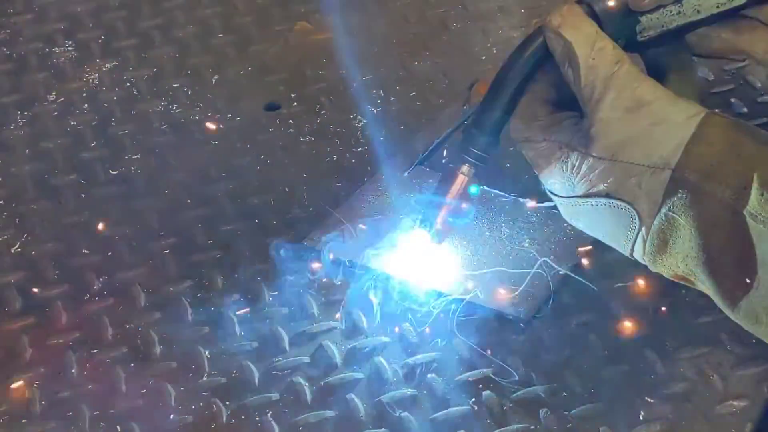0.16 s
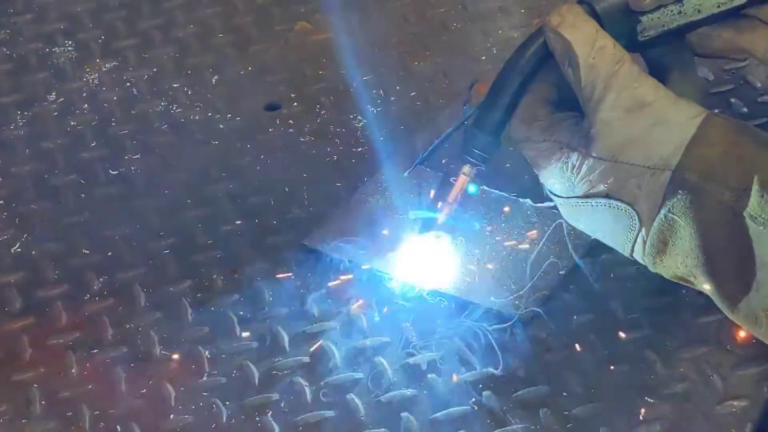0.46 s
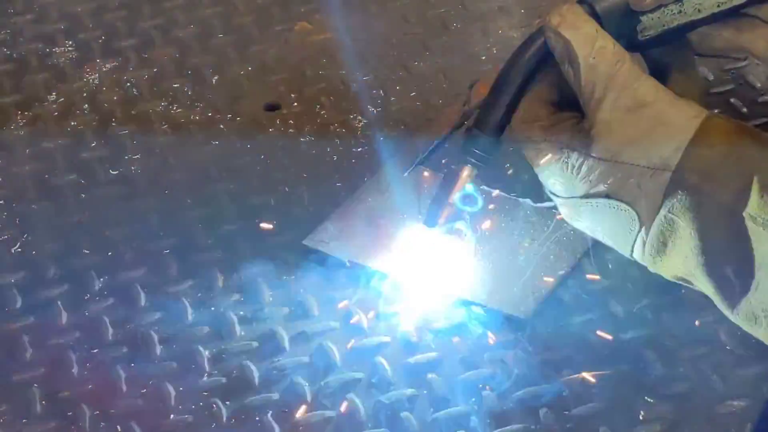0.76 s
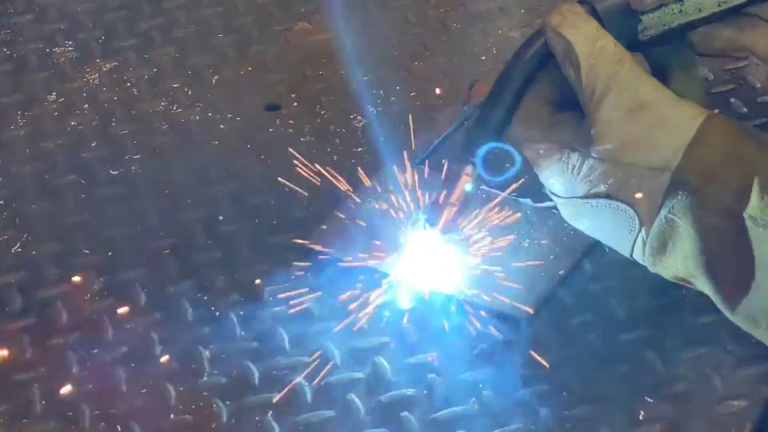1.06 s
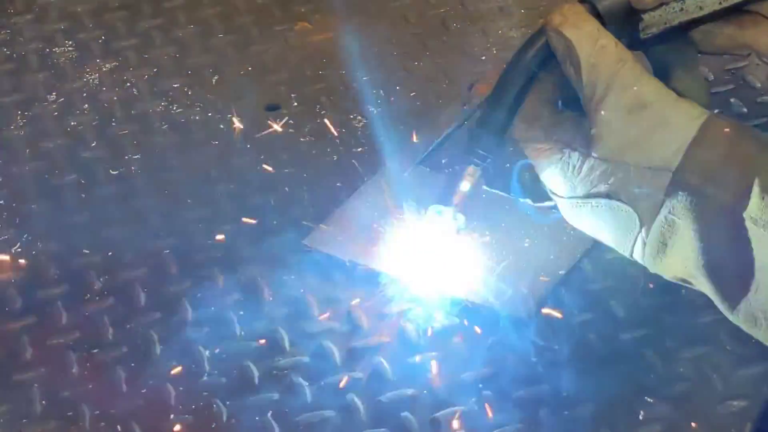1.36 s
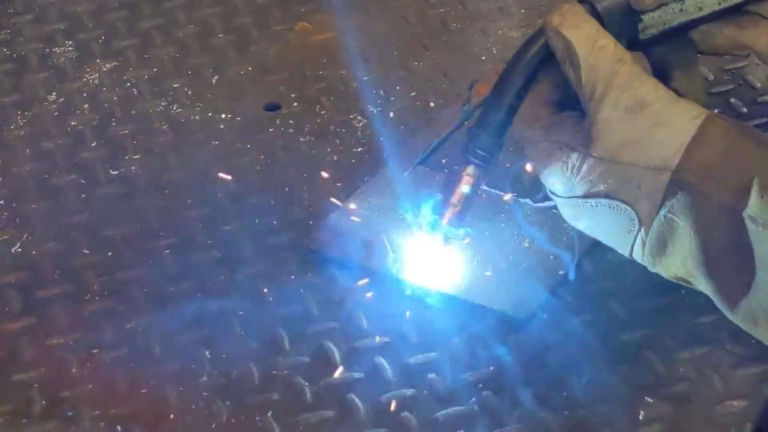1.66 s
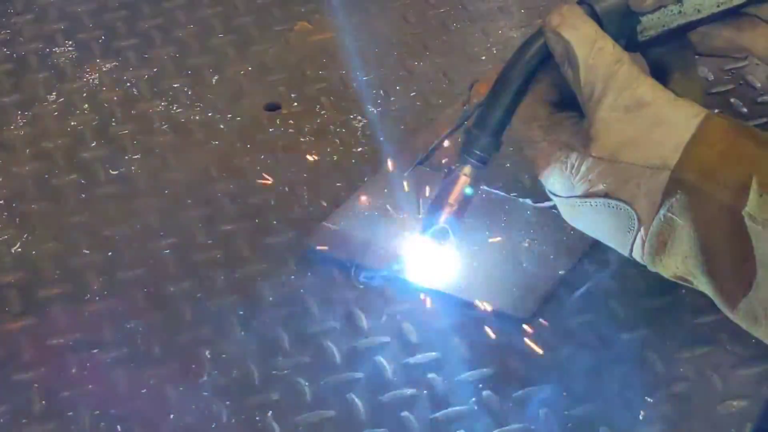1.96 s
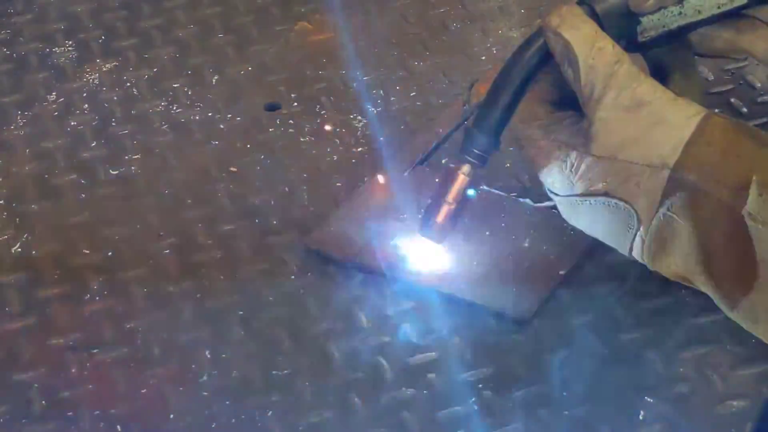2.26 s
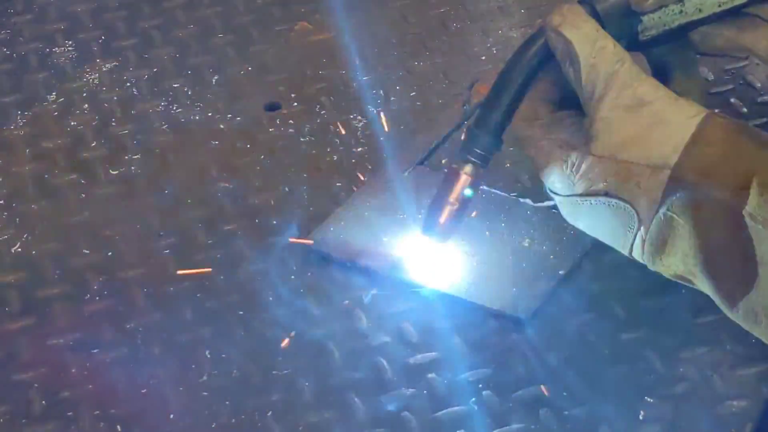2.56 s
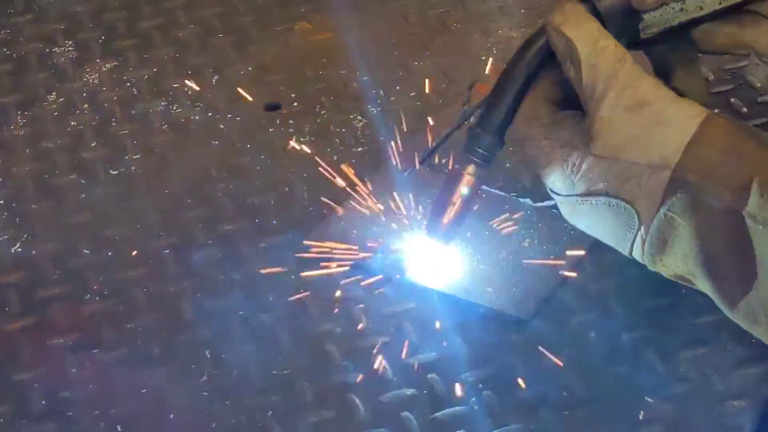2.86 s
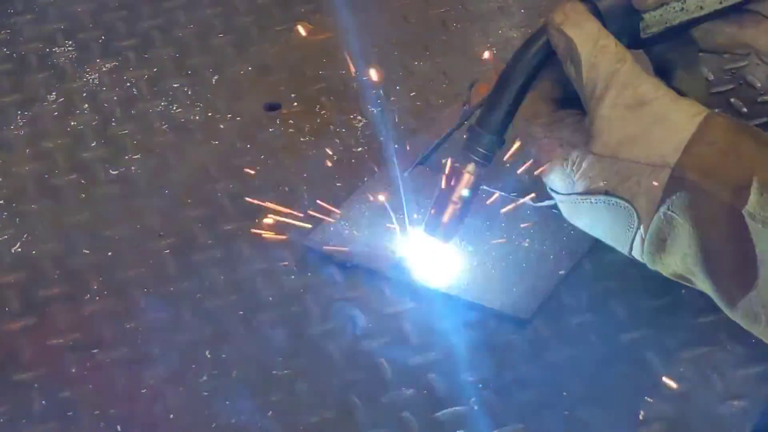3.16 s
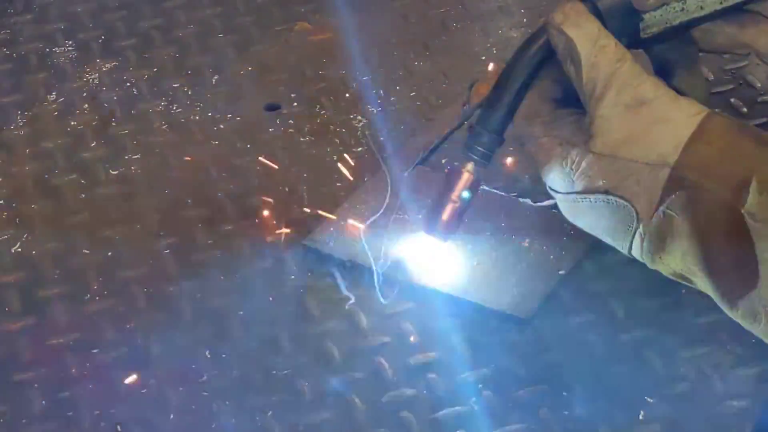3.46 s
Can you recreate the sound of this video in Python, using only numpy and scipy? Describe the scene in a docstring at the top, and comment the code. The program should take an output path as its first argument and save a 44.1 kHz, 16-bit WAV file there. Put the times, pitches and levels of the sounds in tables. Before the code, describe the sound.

A wire-feed welding arc crackles without pause for about 3.6 seconds, dozens of short, broad, gritty pops a second, coarser at first and denser after the first second. Bright sizzle flickers beneath, with a barely audible low hum and tiny dropouts. Close stereo, tight reflections from steel. Low air puffs thump left or right, clustered around 0.4-0.5 and 0.75-1.4 seconds, then scattered, returning after 3.

```python
"""Wire-feed arc welding, close

Steel plate being welded close to a two-port microphone. Each re-strike of the arc is a short broad crack of
coloured noise, some 35-60 a second, over the banded noise of the sizzling pool and a faint resonant hum.
Plate and bench near by return delayed, duller copies; puffs of air, drawn as pressure pulses, thump now
one port, now the other, with fluttering and buffeting made of low noise."""
import sys
import numpy as np
from scipy import signal
from scipy.fft import rfft, irfft
from scipy.io import wavfile
from scipy.ndimage import uniform_filter1d

SR = 44100
rng = np.random.default_rng(int(sys.argv[2]) if len(sys.argv) > 2 else 0)


def persist_wave(psi):
    """Save psi, clipped to +-1, as 16-bit WAV."""
    counts = np.round(np.clip(psi, -1, 1) * 32767).astype(np.int16)
    wavfile.write(sys.argv[1], SR, np.atleast_2d(counts).T)


N = 158760  # samples, 3.6 s

# Level of the arc, before the trims below; sizzle and weaker cracks follow it: t/s, level/dB
ARC_LEVEL = [(0.0, -36.5), (0.2, -35), (0.3, -32), (0.55, -35), (0.7, -29), (0.82, -36), (1.0, -35.5),
             (1.1, -29.5), (1.27, -36.5), (1.41, -28), (1.62, -32.5), (1.95, -28), (2.3, -32.5),
             (2.43, -33), (2.5, -36.5), (2.65, -29.5), (2.95, -28.5), (3.08, -34), (3.3, -30.5),
             (3.6, -32.5)]
# Moments when the arc drops out, with no re-strike and a sag in the sizzle: t/s
DROPOUTS = [.205, .314, .565, 1.316, 1.495, 2.283, 2.471, 3.174]
# Relative colour of the arc at each port, per Hz of bandwidth: f/Hz, left level/dB, right level/dB
PORT_COLOUR = [(60, -2.5, -10), (238, -3, -1.5), (850, 1, -3.5), (2540, -2, -3.5), (4480, -2, -3.5),
               (6230, 2, -0.5), (7950, -1.5, -4), (10240, -7, -3.5), (12700, -5.5, -2.5),
               (14400, 0.5, -3.5), (16000, -9, -0.5)]
# Reflections off nearby plate and bench, relative to the direct arc; left port, then right: delay/ms, level/dB
REFLECTIONS = [
    [(2.52, -10.5), (2.8, -15.5), (3.05, -22.5)],
    [(2.25, -8.5)],
]
# Clear cracks of the re-striking arc, before trim and scatter: t/s, level/dB
CLEAR_CRACKS = [(0.031, -24), (0.053, -21), (0.085, -24.5), (0.147, -21.5), (0.177, -20), (0.232, -20.5),
                (0.279, -18), (0.293, -18), (0.334, -20.5), (0.382, -28.5), (0.412, -29.5), (0.44, -19.5),
                (0.469, -22.5), (0.498, -23.5), (0.521, -23.5), (0.578, -20.5), (0.605, -22.5),
                (0.627, -19), (0.675, -22.5), (0.697, -22), (0.733, -20), (0.778, -24.5), (0.846, -25),
                (0.906, -28), (0.96, -22), (1.026, -23), (1.082, -21.5), (1.11, -20.5), (1.132, -19.5),
                (1.158, -18.5), (1.184, -25), (1.208, -30), (1.27, -28), (1.293, -22.5), (1.338, -20),
                (1.436, -19), (1.447, -22), (1.477, -22), (1.511, -21), (1.559, -20.5), (1.587, -26),
                (1.644, -31), (1.684, -23.5), (1.696, -21), (1.717, -26), (1.732, -25.5), (1.742, -26),
                (1.754, -29), (1.777, -38), (1.784, -24.5), (1.803, -19.5), (1.814, -26.5), (1.837, -30),
                (1.898, -23.5), (1.917, -19), (1.939, -18.5), (1.951, -20.5), (2.0, -22.5), (2.059, -29.5),
                (2.082, -20), (2.111, -24.5), (2.131, -24.5), (2.242, -26.5), (2.265, -22.5),
                (2.321, -18.5), (2.358, -25.5), (2.383, -22.5), (2.423, -21.5), (2.449, -19), (2.489, -27),
                (2.507, -25), (2.551, -23), (2.655, -21), (2.722, -21), (2.762, -22), (2.819, -22),
                (2.83, -28), (2.874, -22), (2.903, -25), (2.949, -19.5), (3.011, -22.5), (3.035, -23.5),
                (3.054, -33), (3.136, -20), (3.209, -19.5), (3.254, -31), (3.296, -30), (3.309, -19.5),
                (3.373, -21.5), (3.458, -30), (3.477, -24), (3.514, -23), (3.553, -21.5)]
# Buffeting before the microphone's filters; left port, then right: start t/s, length/s, level/dB
BUFFETS = [
    [(.8, .085, -30.5), (1.56, 0.038, -31.5)],
    [(.078, 0.013, -22), (.42, .125, -30), (.875, .035, -25), (3.05, 0.03, -26)],
]
# Air puffs before the microphone's filters; left port, then right: t/s, signed peak pressure/full scale
AIR_PUFFS = [
    [(0.3344, 0.41), (0.5788, -0.19), (0.7788, -0.15), (0.822, -0.43), (0.8349, -0.17), (0.8669, -0.18),
     (0.9796, -0.56), (1.1579, -0.24), (1.1834, 0.16), (1.3378, -0.45), (1.3564, 0.58), (1.3739, -0.18),
     (1.8673, -.46), (2.342, -0.2), (2.8022, 0.34), (2.8079, 0.051), (3.374, -.22), (3.3927, 0.41)],
    [(0.0788, -0.26), (0.0847, 0.3), (0.091, -0.31), (0.1156, 0.19), (0.4125, 0.42), (0.4312, -0),
     (0.4454, 0.48), (0.4639, 0.13), (0.4785, 0.56), (0.4928, -0.08), (0.5044, -0.36), (0.5116, 0.41),
     (0.5188, 0.42), (0.5303, 0.27), (0.7575, 0.21), (0.7787, 0.5), (0.8914, 0.23), (0.9044, 0.31),
     (0.9203, -0.23), (1.1839, 0.61), (1.2106, .24), (1.2278, 0.5), (1.2503, 0.44), (2.1643, .7),
     (2.3393, 0.44), (3.0101, -0.58), (3.0564, 0.21), (3.071, 0.34), (3.4367, 0.57), (3.5327, 0.25)],
]

# Sizzle and hum
SIZZLE_TRIM_DB = -2
FLICKER_DB, SURGE_DB, FLICKER_HZ = 1.3, 1.2, 60  # each band alone; all bands together; rate of both
TREBLE_FOLLOW = 0.74  # extra dB above 8 kHz for each dB the arc level is off its mean
DROPOUT_S, DROPOUT_DB = 0.012, -3.5
HUM_HZ, HUM_WIDTH_HZ, HUM_DB = 136.4, 8.2, -50

# Reflections
ECHO_TOP_HZ = 9500

# Cracks
GAP_FIRST_S, GAP_S, SETTLE_S = .029, .0162, .6  # time between re-strikes shrinks as the arc settles
WEAK_OVER_DB, WEAK_SPREAD_DB = 8, 1.6  # weaker cracks over the arc level, and their scatter
WEAK_JITTER_S = .0007
CRACK_TRIM_DB = 1.5
COLOUR_DB, SIDE_DB = 1.3, .9  # scatter per crack: in each band at each port; of each port as a whole
RISE_S, FALL_S = .0014, .0034
GRIT_DB, GRIT_HZ = 1.8, 1500  # grain inside a crack
CRACK_LOW_HZ = 483

# Air
LEAD_S, LEAD_DB, LEAD_HZ = 0.0063, -14.5, 830  # flutter before a puff; level relative to the puff's peak
GUST_HZ, GUST_TOP_HZ, GUST_FADE_S = 201, 520, 0.0021
GUST_LUMP_DB, GUST_LUMP_HZ = 4, 120
PUFF_RISE_S, PUFF_FALL_S = .0001, 0.0015

# Microphone
LOW_CUT_HZ, TOP_HZ = 52.5, 15720


def undb(db):
    """dB to gain."""
    return 10 ** (np.asarray(db) / 20)


def arc_level(t):
    """Level of the arc in dB at time t, in straight lines between the table's points."""
    return np.interp(t, *np.array(ARC_LEVEL).T)


def noise_pair():
    """White noise, unrelated at the two ports."""
    return rng.standard_normal((2, N))


def walk(hz):
    """Random level at each port, held 1 / hz s and slewed twice; spread 1."""
    hold = int(SR / hz)
    level = np.repeat(rng.standard_normal((2, N // hold + 1)), hold, axis=1)
    level = uniform_filter1d(uniform_filter1d(level, hold), hold)[:, :N]
    return level / level.std()


def arc_bands(edges_hz):
    """Noise in the arc's colour, unrelated at the ports, near rms 1 over both, cut into bands at the edges."""
    f = np.maximum(np.arange(N // 2 + 1) * SR / N, 1)
    hz, *port_db = np.array(PORT_COLOUR).T
    # straight lines over log frequency
    gain = undb([np.interp(np.log(f), np.log(hz), db) for db in port_db]) * (f < TOP_HZ)
    spectrum = rfft(noise_pair()) * gain / np.sqrt(np.mean(gain ** 2))
    band = np.searchsorted(edges_hz, f)
    return np.array([irfft(spectrum * (band == k), N) for k in range(len(edges_hz) + 1)])


def sizzle():
    """Pool and gas hiss on as noise, surging together and flickering band by band."""
    t = np.arange(N) / SR
    noise = arc_bands([250, 1000, 3000, 8000, 12000])
    level_db = arc_level(t)
    sag_db = DROPOUT_DB * sum(np.exp(-((t - s) / DROPOUT_S) ** 2) for s in DROPOUTS)
    noise[-2:] *= undb(TREBLE_FOLLOW * (level_db - level_db.mean()))
    flickering = sum(band * undb(FLICKER_DB * walk(FLICKER_HZ)) for band in noise)
    surge = undb(SURGE_DB * walk(FLICKER_HZ)[:1])  # one walk for both ports
    return flickering * surge * undb(level_db + sag_db + SIZZLE_TRIM_DB)


def hum():
    """A faint wavering hum: noise through one narrow resonance."""
    ring = signal.lfilter(*signal.iirpeak(HUM_HZ, HUM_HZ / HUM_WIDTH_HZ, fs=SR), noise_pair())
    return undb(HUM_DB) * ring / ring.std()


def echoes(x):
    """Each port hears the arc again, a little duller, off the steel around it."""
    dull = signal.lfilter(*signal.butter(1, ECHO_TOP_HZ, fs=SR), x)
    late = np.zeros_like(x)
    for port in range(2):
        for delay_ms, db in REFLECTIONS[port]:
            late[port] += undb(db) * np.roll(dull[port], int(round(delay_ms * SR / 1000)))
    return x + late


def strikes():
    """Times and levels of the clear cracks and of weaker ones spread near evenly through the longer gaps."""
    rows = list(CLEAR_CRACKS)
    times = [t for t, _ in CLEAR_CRACKS] + [N / SR]
    for a, b in zip(times[:-1], times[1:]):
        gap = GAP_S + (GAP_FIRST_S - GAP_S) * np.exp(-a / SETTLE_S)
        steps = max(int(round((b - a) / gap)), 1)
        chance = rng.standard_normal((16, 2))
        for k in range(1, steps):
            t = a + (b - a) * k / steps + WEAK_JITTER_S * chance[k, 0]
            db = arc_level(t) + WEAK_OVER_DB + WEAK_SPREAD_DB * chance[k, 1]
            rows.append((t, db))
    rows = np.array(rows)
    from_dropout_s = np.abs(rows[:, :1] - DROPOUTS).min(axis=1)
    return rows[from_dropout_s > DROPOUT_S]


def cracks():
    """Re-strikes: gritty noise bursts that swell and die in milliseconds, each coloured apart at each port."""
    t, db = strikes().T
    noise = arc_bands([1000, 3000, 8000, 12000])
    colour_db = COLOUR_DB * rng.standard_normal((5, 2, len(t)))  # band, port, crack
    side_db = SIDE_DB * rng.standard_normal((2, len(t)))
    size = np.zeros(noise.shape)
    size[..., (t * SR).astype(int)] = undb(db + CRACK_TRIM_DB + colour_db + side_db)
    u = np.arange(-1024, 1025) / SR
    shape = np.where(u < 0, np.exp(u / RISE_S), np.exp(-u / FALL_S))
    # overlapping cracks add in power
    power = signal.fftconvolve(size ** 2, shape[None, None] ** 2, mode="same", axes=2)
    burst = (noise * np.sqrt(np.maximum(power, 0))).sum(axis=0)
    gritty = burst * undb(GRIT_DB * walk(GRIT_HZ))
    return signal.lfilter(*signal.butter(2, CRACK_LOW_HZ, "high", fs=SR), gritty)


def flutter():
    """Low-passed noise, brighter than the buffeting, that builds up before each puff and stops at its onset."""
    t = np.arange(N) / SR
    lead = np.zeros((2, N))
    for port in range(2):
        for s, peak in AIR_PUFFS[port]:
            lead[port] += abs(peak) * undb(LEAD_DB) * np.exp(-np.abs(t - s) / LEAD_S) * (t < s)
    low_pass = signal.butter(1, LEAD_HZ, fs=SR)
    noise = signal.lfilter(*low_pass, signal.lfilter(*low_pass, noise_pair()))
    return lead * noise / noise.std()


def buffeting():
    """Stirred air on one port at a time: low noise in lumps, faded in and out."""
    t = np.arange(N) / SR
    stir = np.zeros((2, N))
    for port in range(2):
        for s, length, db in BUFFETS[port]:
            inside_s = np.minimum(t - s, s + length - t)
            stir[port] += undb(db) * np.clip(inside_s / GUST_FADE_S + .5, 0, 1)
    low = signal.lfilter(*signal.butter(1, GUST_HZ, fs=SR), noise_pair())
    low = signal.lfilter(*signal.butter(2, GUST_TOP_HZ, fs=SR), low)
    lumpy = low * undb(GUST_LUMP_DB * walk(GUST_LUMP_HZ))
    return stir * lumpy / lumpy.std()


def puffs():
    """Sharp pressure pulses, each on one port only: a very fast rise and an exponential fall."""
    t = np.arange(N) / SR
    pressure = np.zeros((2, N))
    for port in range(2):
        for s, peak in AIR_PUFFS[port]:
            u = np.maximum(t - s, 0)
            pulse = (1 - np.exp(-u / PUFF_RISE_S)) * np.exp(-u / PUFF_FALL_S)
            pressure[port] += peak * pulse / pulse.max()
    return pressure


def scene():
    """Arc, pool and hum with their reflections, and moving air at the ports."""
    arc = sizzle() + hum() + cracks()
    air = flutter() + buffeting() + puffs()
    return echoes(arc) + air


def record(dry):
    """The microphone's steep low cut, which rings after each puff, and its steep top."""
    cut = signal.sosfilt(signal.cheby1(4, .5, LOW_CUT_HZ, "high", fs=SR, output="sos"), dry)
    return signal.sosfilt(signal.ellip(12, .2, 70, TOP_HZ, fs=SR, output="sos"), cut)


dry = scene()
out = record(dry)
persist_wave(out)
```